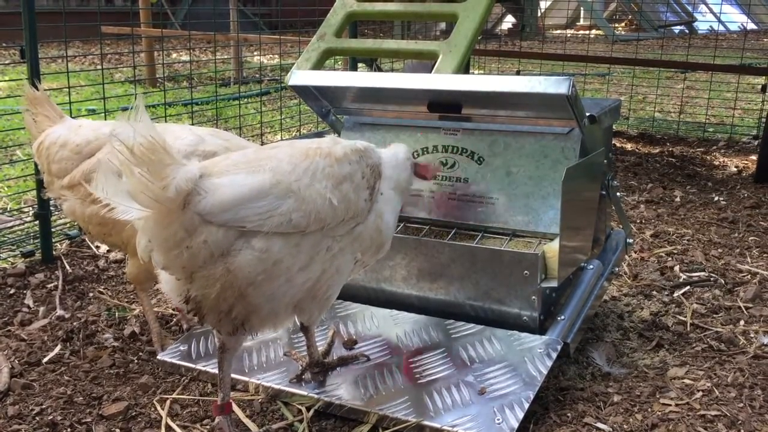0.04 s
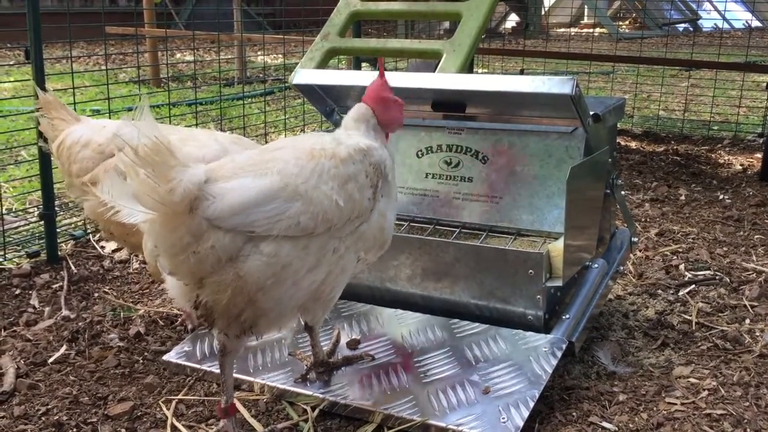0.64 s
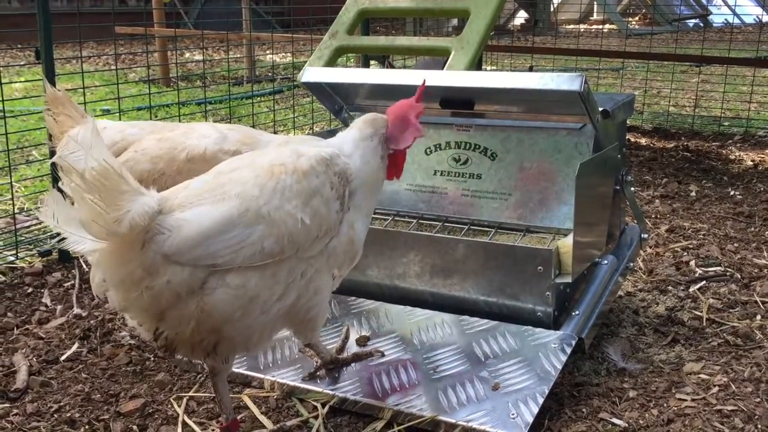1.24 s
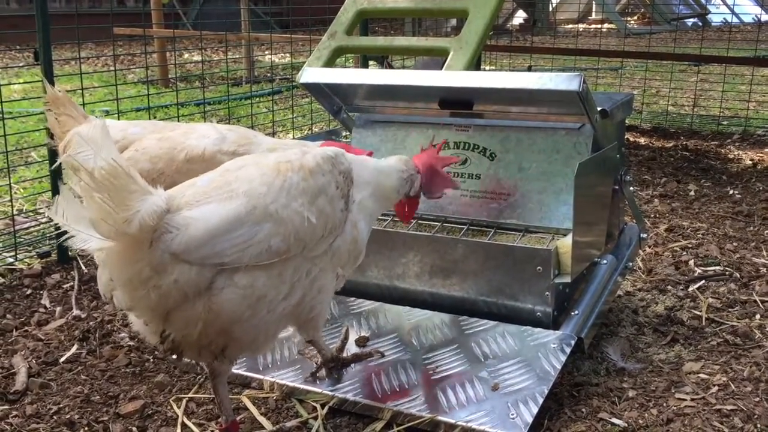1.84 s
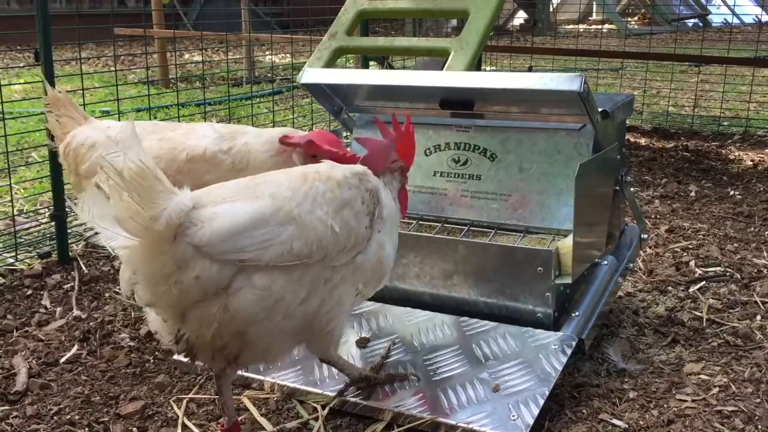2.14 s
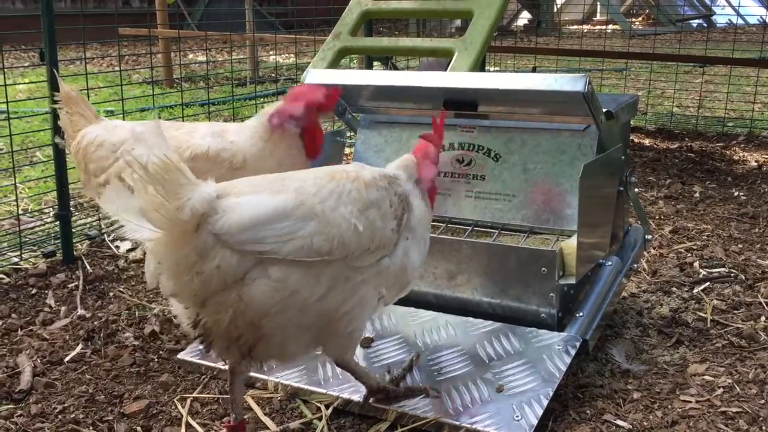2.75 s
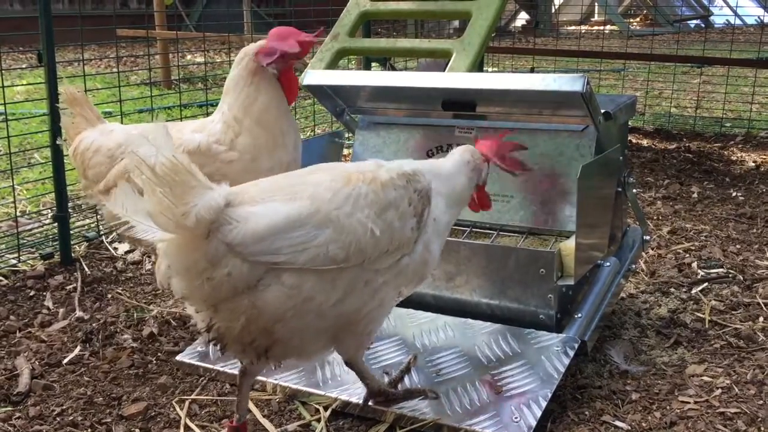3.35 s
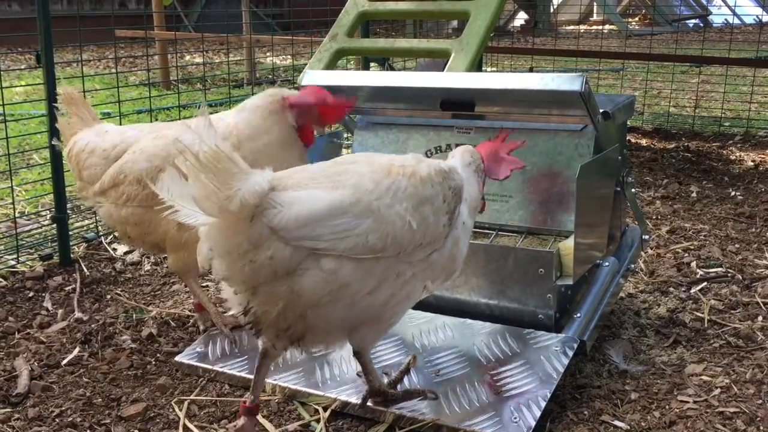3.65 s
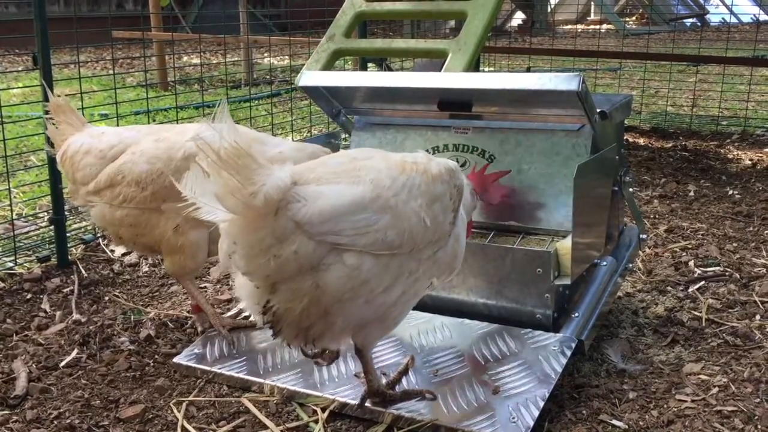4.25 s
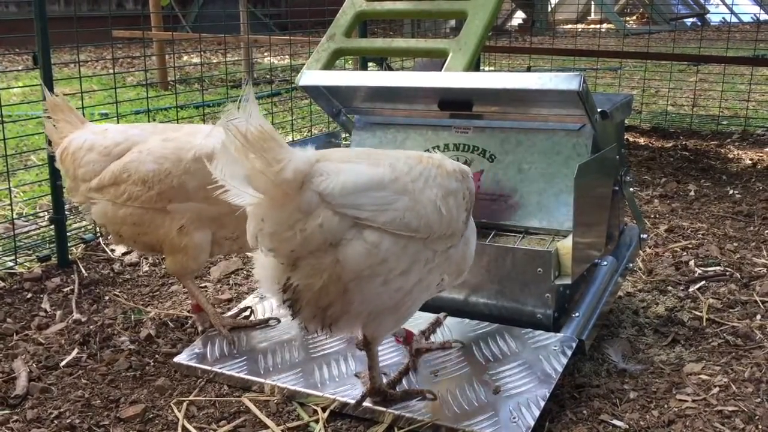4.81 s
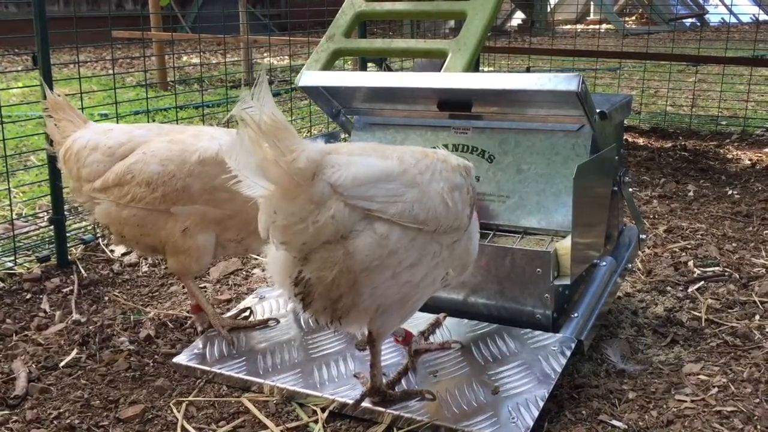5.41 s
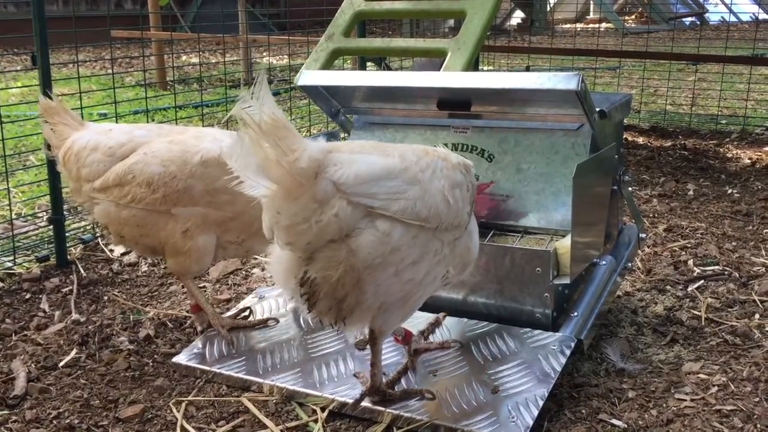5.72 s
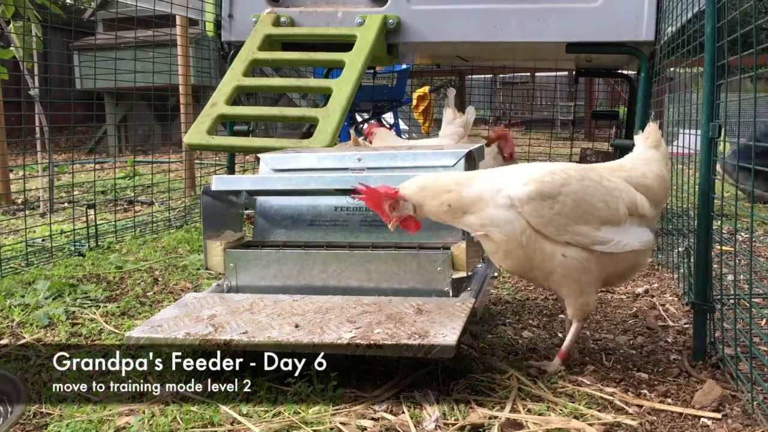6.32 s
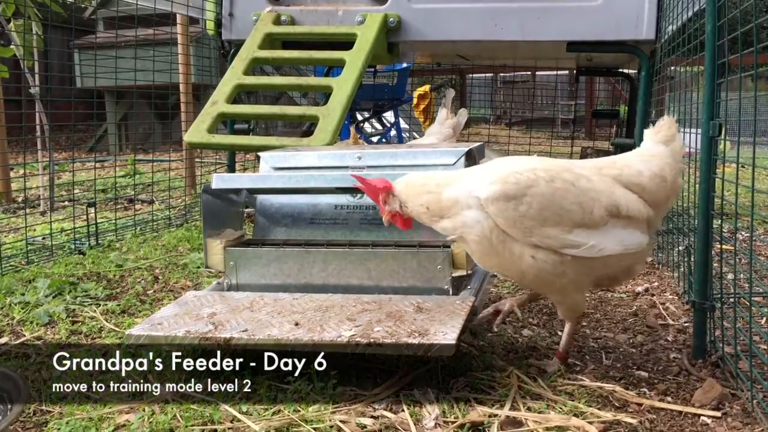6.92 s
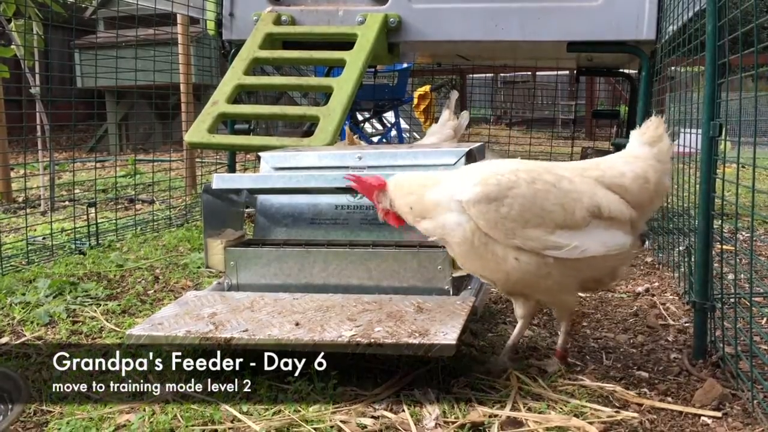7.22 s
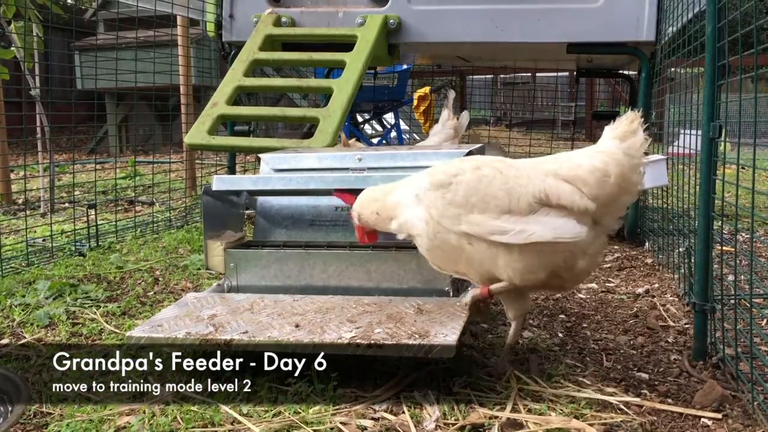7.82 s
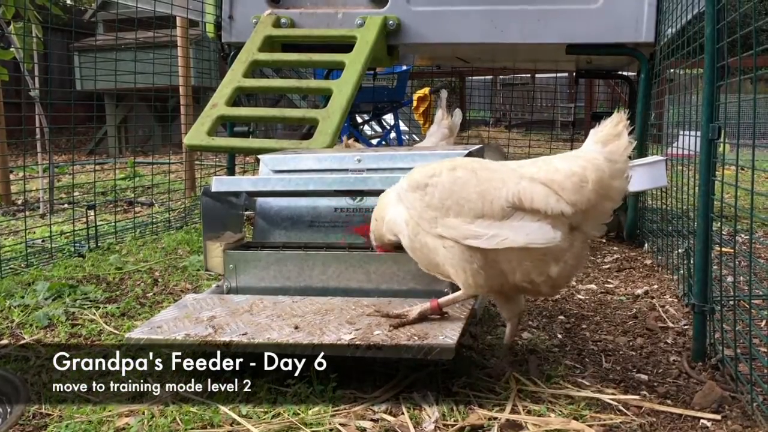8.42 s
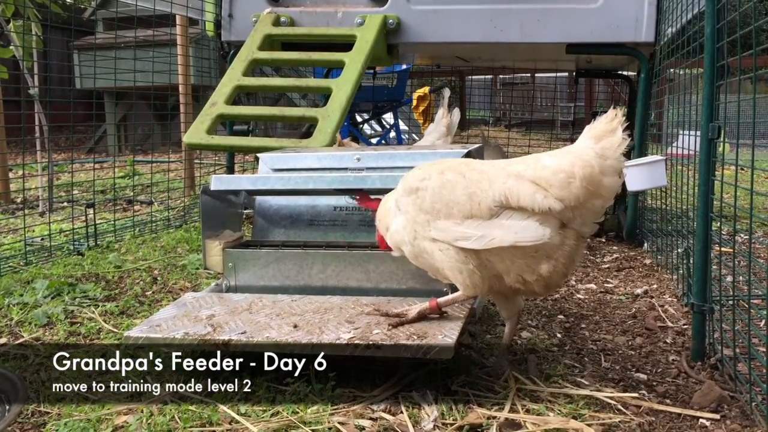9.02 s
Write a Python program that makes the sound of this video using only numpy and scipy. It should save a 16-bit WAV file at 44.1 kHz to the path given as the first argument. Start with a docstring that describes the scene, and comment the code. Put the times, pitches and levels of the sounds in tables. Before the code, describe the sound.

Hens click and clank on a ringing sheet metal feeder, with soft feather brushes over a faint outdoor rumble.

```python
"""Hens at metal treadle feeders in a quiet run. First come a low outdoor rumble and faint, distant bird
whistles. From 0.45 s beaks and claws click on the near feeder: its sheet metal rings and heavy blows shake the
box. Loose feed ticks and the box gives one hollow knock. Just after 2 s a foot scuffs and the linkage rattles;
from 3 s feathers brush past, and later, feet pad softly. Just before 6 s the background switches to the air at
a feeder further off, where a tap rings the rim at 7 s and claws click on the treadle around 8 s."""
import sys
import numpy as np
from scipy import signal
from scipy.fft import rfft, irfft, next_fast_len
from scipy.io import wavfile
from scipy.ndimage import uniform_filter1d

SR = 44100
rng = np.random.default_rng(int(sys.argv[2]) if len(sys.argv) > 2 else 0)


def digitize_waveform(pressure):
    """Quantize a signal to 16-bit integers and store it at the path in sys.argv[1].

    Rows of a 2-D input are taken as channels; values are limited to [-1, 1].
    """
    field = np.atleast_2d(pressure).T
    bounded = np.clip(field, -1, 1)
    quanta = np.round(bounded * 32767).astype(np.int16)
    wavfile.write(sys.argv[1], SR, quanta)


N = 399546


def undb(db):
    """Turn decibels into a gain to multiply by."""
    return 10 ** (np.asarray(db) / 20)


def unit(x):
    """Scale to an average (rms) level of 1."""
    return x / np.sqrt(np.mean(x ** 2))


def over_hz(points, hz):
    """Read between (frequency, value) points, with octaves evenly spaced."""
    f, value = np.transpose(points)
    return np.interp(np.log(np.maximum(hz, 1)), np.log(f), value)


def fade(t, t60):
    """Die away by 60 dB in t60 seconds."""
    return np.exp(-np.log(1000) * t / np.maximum(t60, 1e-3))


def add(out, s, x):
    """Mix x into out, starting at s seconds."""
    i = max(int(s * SR), 0)
    out[i:i + len(x)] += x[:max(len(out) - i, 0)]


def noise_bands(gain, size, count):
    """Shape noise by gain and split it into bands; return their centres and their samples."""
    centres = np.geomspace(30, 16000, count)
    hz = np.fft.rfftfreq(size, 1 / SR)
    spectrum = rfft(rng.standard_normal(size)) * gain
    masks = [np.interp(hz, centres, row) for row in np.eye(count)]
    return centres, irfft(spectrum * np.array(masks), size)


def wander(rate):
    """A smooth random curve, mostly within -1 to 1, that takes rate steps a second."""
    k = int(SR / rate)
    steps = np.clip(rng.standard_normal(N // k + 1), -1.6, 1.6)
    return 1.4 * uniform_filter1d(uniform_filter1d(np.repeat(steps, k), k), k)[:N]


def air(spectrum, db, rumble_db, flutter_db, waver_db):
    """A rumble with a soft rush above it; every band wavers a little, the low ones most."""
    size = next_fast_len(N)
    colour = unit(undb(over_hz(spectrum, np.fft.rfftfreq(size, 1 / SR))))
    centres, bands = noise_bands(colour, size, count=12)
    out = np.zeros(N)
    for hz, band in zip(centres, bands):
        bass_db = (rumble_db + flutter_db * wander(7.1)) / (1 + (hz / 300) ** 2)
        out += band[:N] * undb(db + bass_db + waver_db * wander(1.7))
    return out


# tone colour of the air at each feeder: f/Hz, level/dB
NEAR_AIR_COLOUR = [(15, -42), (25, -14.5), (49, -5.5), (70, -0.5), (223, -16), (394, -26), (531, -30),
                   (695, -26.5), (1440, -30.5), (1940, -34.5), (2280, -36), (3250, -40.5), (10400, -46.5),
                   (12900, -46.5), (16000, -48.5)]
FAR_AIR_COLOUR = [(15, -54), (25, -26), (59, 0.5), (80, 3), (110, -5.5), (190, -6), (242, -13), (363, -15),
                  (531, -20), (988, -18.5), (1440, -22), (2350, -24.5), (4870, -30), (14000, -35),
                  (16000, -38)]
# rise and fall of the rumble at the near feeder: t/s, level/dB
RUMBLE_SWELL = [(0, 3), (.4, -0.5), (1.5, -0.5), (1.95, -4.5), (2.9, 2.5), (3.2, -3), (3.6, 1),
                (5.15, -2.5), (5.7, 1)]

def outdoors(switch_s=5.86):
    """The outdoor air, first at the near feeder and then at the far one."""
    t = np.arange(N) / SR
    swell_db = np.interp(t, *np.transpose(RUMBLE_SWELL))
    near = air(NEAR_AIR_COLOUR, db=-60.5, rumble_db=swell_db, flutter_db=3.5, waver_db=.34)
    far = air(FAR_AIR_COLOUR, db=-68.5, rumble_db=0, flutter_db=1.5, waver_db=.57)
    return np.where(t < switch_s, near, far)


# distant whistles: t/s, start f/Hz, end f/Hz, level/dB
BIRD_NOTES = [(.04, 2080, 1970, -77), (.05, 3300, 3410, -83), (1.26, 1845, 1897, -72),
              (1.43, 2680, 2525, -79.5), (1.66, 1382, 1509, -73), (3.14, 3490, 3480, -76),
              (3.19, 2100, 1964, -71.5), (3.3, 2740, 2620, -81)]

def birds(note_s=.17, trees_s=.54, waver=.055, early_s=.04, size=32768):
    """Gliding, wavering whistles from far off, smeared by echoes from the trees."""
    out, t = np.zeros(N), np.arange(size) / SR
    along = np.clip(t / note_s, 0, 1)
    for s, start_hz, end_hz, db in BIRD_NOTES:
        pitch = (start_hz + (end_hz - start_hz) * along) * (1 + waver * wander(90)[:size])
        note = np.sin(np.pi * along) * np.sin(2 * np.pi * np.cumsum(pitch) / SR)
        heard = signal.fftconvolve(note, rng.standard_normal(size) * fade(t, trees_s))
        add(out, s - early_s, 2 * undb(db) * heard / np.abs(heard).max())
    return out


def sheet_overtones(spacing_hz, size, between=.04, count=900):
    """A flat sheet's overtones lie about evenly from low to high: 1 at each, a little rattle between."""
    tone_hz = np.cumsum(spacing_hz * rng.uniform(.15, 1.85, count))
    lines = np.full(size // 2 + 1, between)
    lines[(tone_hz[tone_hz < SR / 2] * size / SR).astype(int)] = 1
    return lines


def contact(hz, bass_db, treble_db):
    """Tone colour of one touch: how strongly it stirs the low and the high tones."""
    return undb(bass_db / (1 + (hz / 2200) ** 2) + treble_db * (1 - 1 / (1 + (hz / 8000) ** 2) ** 2))


def strike(blows, tones, sheet, decay, spacing_hz, ring_db, spot_db,
           crack_db, crack_s, box_db, box_s, sustain, size=32768):
    """Each blow cracks, stirs the metal's many overtones and leaves its strongest tones ringing."""
    out, t, hz = np.zeros(N), np.arange(size) / SR, np.fft.rfftfreq(size, 1 / SR)
    smooth = unit(undb(over_hz(sheet, hz)))
    colour = unit(smooth * sheet_overtones(spacing_hz, size))
    tone_hz, tone_db, tone_t60 = np.transpose(tones)[:, :, None]
    for s, db, softness, own_ring_db, drag_s, spot_hz in blows:
        # a soft touch gives more bass and less treble
        bass_db, treble_db = -13 + 18.5 * softness, -13 * softness ** 4
        touch = contact(hz, bass_db, treble_db)
        # a dragging beak or claw makes the sound build more slowly and last longer
        rise = 1 - np.exp(-t / max(drag_s, 1e-4))
        stretch = sustain * (1 + drag_s / .009)
        centres, bands = noise_bands(colour * touch, size, count=16)
        overtones = (bands * fade(t, stretch * over_hz(decay, centres)[:, None])).sum(0)
        crack = undb(crack_db) * bands[centres > 2500].sum(0) * fade(t, crack_s)
        # the spot that is hit decides how loud each tone is
        share, detune, phase = rng.standard_normal((3, len(tones), 1))
        favoured = np.exp(-(np.log2(tone_hz / spot_hz) / .22) ** 2)
        gain = undb(tone_db + 2.2 * share + spot_db * favoured + ring_db + own_ring_db)
        gain *= contact(tone_hz, bass_db / 2, treble_db)
        waves = np.sin(2 * np.pi * (tone_hz * (1 + .0017 * detune) * t + phase))
        ring = (gain * waves * fade(t, stretch * tone_t60)).sum(0)
        # the box's other panels add a faint, duller tail
        panels = rfft(rng.standard_normal(size)) * smooth * touch / (1 + hz / 3000)
        box = undb(box_db) * irfft(panels) * fade(t, box_s)
        add(out, s, undb(db) * rise * (overtones + crack + ring + box))
    return out


# blows on the near feeder: t/s, level/dB, softness/0-1, extra ring/dB, drag/s, favoured f/Hz
NEAR_BLOWS = [(.4515, -36.5, 1, 1, 0.00085, 2555), (.4575, -33, 0.79, 4, 0.0035, 930),
              (.4960, -41.5, .1, -1, .0009, 6000), (.5132, -40, .8, 4.5, .0005, 980),
              (.5206, -35, .55, -2, .0003, 2630), (.5753, -18.5, 0, -2, 0.00035, 1000),
              (.5925, -25.5, .5, -1.5, 0.000096, 1682), (2.0835, -43, 0.8, -9, 0.00047, 4800),
              (2.0906, -36, 0.58, -8, .0001, 9300), (2.1275, -27, .25, -5, .0003, 4000),
              (2.2178, -49, 0.46, -1.5, 0.00046, 6200), (2.6095, -43.5, 0.48, -3, .003, 7140),
              (2.6432, -35, 0.56, -2.5, .0011, 3900), (2.6453, -28, 0.15, -6.5, 0.00031, 9450),
              (2.7235, -42.5, 0.8, -16, .0008, 2000), (2.7490, -50.5, 0.99, 0, 0.00093, 2700),
              (4.7520, -41, 0.28, -10.5, 0.00012, 4880), (4.7996, -66, 0.8, 7, .0008, 6160)]
# its strongest tones: f/Hz, level/dB, base fade time/s
NEAR_TONES = [(365, -15, .12), (607, -9, .11), (645, -11, .1), (735, -9, .1), (938, -13, .13),
              (1000, -18, .15), (1034, -32, .9), (1663, -19, .3), (1863, -22, .17), (2500, -11, .13),
              (2610, -12, .12), (2708, -17, .24), (3060, -11, .1), (3580, -7, .1), (3750, -5, .1),
              (3850, -5, .1), (3930, -3, .1), (4760, -9, .085), (5250, -10, .08), (5780, -5, .07),
              (6200, -5, .07), (6615, -4, .07), (7235, -3, .06), (7855, -6, .065), (8889, 0, .05),
              (9307, -4, .045), (9476, -3, .045), (9766, -2, .045), (10729, -7, .055)]
# colour of its overtones: f/Hz, level/dB
NEAR_COLOUR = [(30, -28.5), (100, -16.5), (330, -6), (700, -5.5), (850, -14), (1020, 0.5), (1400, -6.5),
               (2600, -2.5), (4500, -2), (6500, 4.5), (9500, 5), (10500, -1), (13000, 0), (16000, -13)]
# how long they last: f/Hz, base fade time/s
NEAR_FADES = [(150, 0.32), (500, .12), (1500, .14), (4000, 0.12), (8000, 0.034), (15000, 0.086)]

def near_pecks():
    """Beaks and claws click on the near feeder's sheet metal, which rings briefly."""
    return strike(NEAR_BLOWS, NEAR_TONES, NEAR_COLOUR, NEAR_FADES, spacing_hz=95.2, ring_db=-9.5,
                  spot_db=9, crack_db=-4.5, crack_s=.0063, box_db=-31, box_s=.54, sustain=.86)


def knocks(events, tones, lag_cycles, width, size=16384):
    """Each knock stirs a few short, noisy tones (width: share of their pitch); lag delays low ones most."""
    out, t, hz = np.zeros(N), np.arange(size) / SR, np.fft.rfftfreq(size, 1 / SR)
    middle = np.mean(np.log2(np.array(tones)[:, 0]))
    for s, db, tilt_db in events:
        for centre, own_db, t60 in tones:
            shape = hz / (hz + centre) / (1 + ((hz - centre) / (width * centre)) ** 2)
            band = irfft(rfft(rng.standard_normal(size)) * shape)
            envelope = (1 - np.exp(-t * centre)) * fade(t, t60)
            body = unit(band * envelope) * np.sqrt(np.mean(envelope ** 2))
            gain = undb(db + own_db + tilt_db * (np.log2(centre) - middle))
            add(out, s + lag_cycles / centre, gain * body)
    return out


# heavy blows: t/s, level/dB, tilt towards treble/dB per octave
CLUNK_HITS = [(.576, -34.5, 1), (2.089, -48.5, -5.5), (2.1255, -43, -3.5), (2.643, -46.5, -1.5)]
# tones of the shaken box: f/Hz, level/dB, fade time/s
BOX_TONES = [(166, -11.5, 0.35), (268, -5.5, .08), (420, -1.5, .07), (650.5, 1.5, .07), (1000, -3.5, .08)]

def treadle_clunks():
    """The treadle, the plate a hen steps on, hits its stop and shakes the box."""
    return knocks(CLUNK_HITS, BOX_TONES, lag_cycles=1.5, width=.22)


# light touches: t/s, level/dB, tilt/dB per octave
TICK_HITS = [(.9485, -62.5, 2.5), (1.133, -73, 0), (2.3527, -68.5, 3.5), (2.772, -58.5, -4),
             (2.8346, -59, 0), (6.625, -71, -11), (7.2366, -68, 2), (7.4595, -69.5, 0)]
# tones of a tick: f/Hz, level/dB, fade time/s
TICK_TONES = [(3800, -9.5, .04), (7500, -4.5, 0.033), (12500, -2.5, .03)]

def light_ticks():
    """Claw tips and loose feed make tiny, high ticks."""
    return knocks(TICK_HITS, TICK_TONES, lag_cycles=0, width=.27)


# one knock: t/s, level/dB, tilt/dB per octave
HOLLOW_HITS = [(1.2155, -47, 0)]
# tones of the hollow box: f/Hz, level/dB, fade time/s
HOLLOW_TONES = [(259.4, -1.5, 0.087), (468, -10, 0.059), (1015, -13.5, 0.07), (1190, -14, 0.06),
                (1380, -15, 0.056), (1694, -17.5, 0.055)]

def hollow_knock():
    """The hollow box answers a knock with a short, low note."""
    return knocks(HOLLOW_HITS, HOLLOW_TONES, lag_cycles=.1, width=.018)


# brushing strokes, the first a short foot scuff, the rest feathers: middle t/s, length/s, level/dB, treble/dB
BRUSH_STROKES = [(2.037, .025, -56.5, -9), (2.961, 0.12, -58.5, -0.5), (3.066, 0.083, -60.5, 6),
                 (3.213, .17, -67, 2.5), (3.49, 0.047, -78.5, -7), (3.622, 0.1, -69, 1),
                 (3.892, 0.1, -62.5, 0), (4.038, 0.06, -59.5, 0), (4.148, 0.079, -70, -3),
                 (4.342, 0.19, -67, 1), (4.47, 0.059, -72, 2), (4.577, 0.058, -65, -9),
                 (4.65, 0.058, -60.5, 0)]
# colour of their hiss: f/Hz, level/dB
FEATHER_COLOUR = [(1000, -20), (2500, -7.5), (3800, -6), (5000, -7), (7000, -1), (7450, -3), (8000, -2),
                  (9300, 0), (10500, -2), (12500, 2.5), (15000, 0.5), (16000, -10)]

def feathers(grain_db=2.5, catch_db=.97, steepness=1.8, size=32768):
    """Tiny feather barbs flick over the metal edge in a hiss; each stroke swells, catches and slips away. The
    first, short stroke is a foot scuffing the metal."""
    out, t, hz = np.zeros(N), (np.arange(size) - size / 2) / SR, np.fft.rfftfreq(size, 1 / SR)
    colour = undb(over_hz(FEATHER_COLOUR, hz))
    for s, length, db, treble_db in BRUSH_STROKES:
        barbs = rng.standard_normal(size) * undb(grain_db * np.minimum(rng.exponential(size=size), 5))
        hiss = unit(irfft(rfft(barbs) * colour * contact(hz, 0, treble_db)))
        pressure = np.hanning(size) / (1 + (t / length) ** 2) ** steepness
        add(out, s + t[0], undb(db) * pressure * hiss)
    return out * undb(catch_db * wander(140))


# jolts of the linkage: t/s, level/dB, tilt/dB per octave
RATTLE_HITS = [(2.093, -50, 14), (2.224, -53, 5), (2.731, -51.5, 3), (4.759, -58.5, -16),
               (4.8112, -52.5, -7)]
# its tones: f/Hz, level/dB, fade time/s
LINKAGE_TONES = [(1200, -3, 0.063), (1960, -4.5, 0.14)]

def linkage_rattles():
    """The treadle's linkage rattles as a hen's weight shifts."""
    return knocks(RATTLE_HITS, LINKAGE_TONES, lag_cycles=.86, width=.14)


# steps: t/s, level/dB, tilt/dB per octave
STEPS = [(4.7862, -52.5, 0.5), (4.815, -61, -1), (6.301, -63, -2.5), (6.762, -62, 0.5), (6.825, -60, -2.5),
         (6.930, -61, 1)]
# tones of a step: f/Hz, level/dB, fade time/s
STEP_TONES = [(172, 1, 0.11), (300, -2, 0.048), (630, -1.5, 0.04), (1180, -10, 0.1), (2400, -16, 0.094)]

def footsteps():
    """Padded feet land softly on the plate and the litter."""
    return knocks(STEPS, STEP_TONES, lag_cycles=.42, width=.3)


# blows on the far rim and treadle: t/s, level/dB, softness/0-1, extra ring/dB, drag/s, favoured f/Hz
RIM_BLOWS = [(7.0338, -39.5, 0.6, 0, 0.00076, 2490)]
CLAW_BLOWS = [(7.8940, -52.5, .2, -9, 0.0011, 6570), (7.9280, -55, .05, 3, 0.0047, 7060),
              (7.9492, -48, .75, 0, 0.0009, 1750), (7.9620, -54.5, 0.99, 5.5, 0.0028, 3260),
              (8.0110, -66, 0.51, -4, 0.0008, 3300), (8.1430, -43, 0.35, 1, 0.0025, 3850),
              (8.1520, -40, .1, -0.5, 0.00053, 8300), (8.2325, -58.5, 0.73, 6, .001, 3880)]
# strongest tones of each part: f/Hz, level/dB, base fade time/s
RIM_TONES = [(1040, -12, 0.29), (2478, -1.5, 0.21), (2480, -4, 0.15), (3170, -14, 0.2), (3720, -8, 0.11),
             (3900, -3.5, 0.16), (4060, 0.5, 0.12), (4590, -3, 0.19), (4620, 0, 0.19), (4770, 1, 0.17),
             (4670, 0, 0.15), (5550, 3, 0.078), (7340, -8, 0.053), (7700, 5.5, 0.09), (7900, 4, 0.061)]
TREADLE_TONES = [(731, -19.5, 0.16), (994, -18, 0.31), (1054, -18, 0.13), (1730, -15, 0.23),
                 (2200, -8.5, .17), (2850, -15, 0.1), (3295, -11, 0.25), (3500, -13, 0.17),
                 (3584, -12, 0.18), (3740, -14, 0.13), (4020, -10, .13), (4260, -23, 0.16),
                 (4800, -10, 0.14), (5030, -23, .13), (5270, -5, 0.14), (6560, -3.5, 0.078),
                 (8306, -10, .05)]
# colour of the overtones of both: f/Hz, level/dB
FAR_COLOUR = [(30, -40), (100, -13), (600, -14.5), (1200, -12), (2800, -5.5), (4000, -4.5), (6000, 2.5),
              (8200, 4.5), (10000, -5), (16000, -22)]
# how long they last: f/Hz, base fade time/s
FAR_FADES = [(300, 0.35), (2000, 0.37), (4000, 0.25), (8000, 0.037), (15000, 0.16)]

def far_taps():
    """A clean tap rings the far feeder's rim, then claws click on its metal treadle."""
    rim = strike(RIM_BLOWS, RIM_TONES, FAR_COLOUR, FAR_FADES, spacing_hz=55.2, ring_db=-4,
                 spot_db=1, crack_db=-19, crack_s=.017, box_db=-14, box_s=.39, sustain=.85)
    claws = strike(CLAW_BLOWS, TREADLE_TONES, FAR_COLOUR, FAR_FADES, spacing_hz=99.5, ring_db=-5.5,
                   spot_db=12.5, crack_db=-3, crack_s=.015, box_db=-17, box_s=.31, sustain=.83)
    return rim + claws


def scene():
    """Add all the sounds into one channel, in the order they are first heard."""
    mix = outdoors() + birds() + near_pecks() + treadle_clunks() + light_ticks() + hollow_knock()
    mix += feathers() + linkage_rattles() + footsteps() + far_taps()
    return mix[None]


def record(dry, low_hz=36, top_hz=16000):
    """The microphone drops the deepest rumble and the very highest treble."""
    lean = signal.sosfilt(signal.butter(4, low_hz, "high", fs=SR, output="sos"), dry)
    return signal.sosfilt(signal.ellip(8, .2, 70, top_hz, fs=SR, output="sos"), lean)


dry = scene()
out = record(dry)
digitize_waveform(out)
```